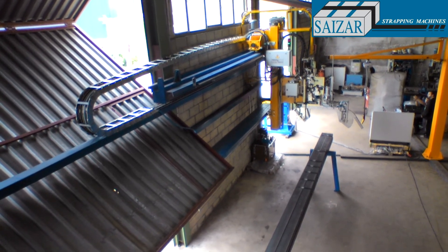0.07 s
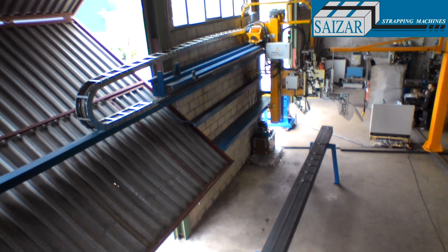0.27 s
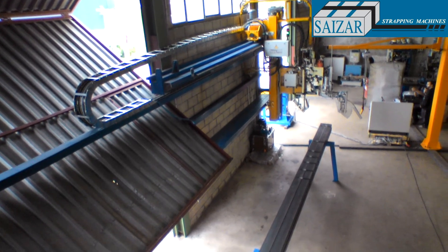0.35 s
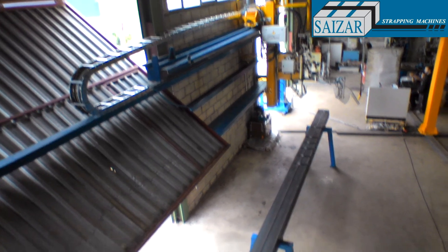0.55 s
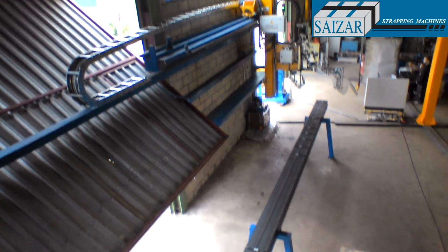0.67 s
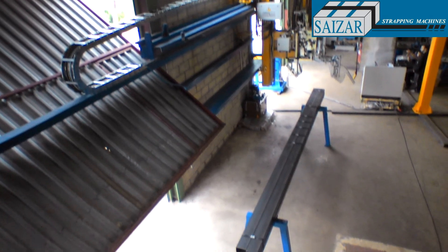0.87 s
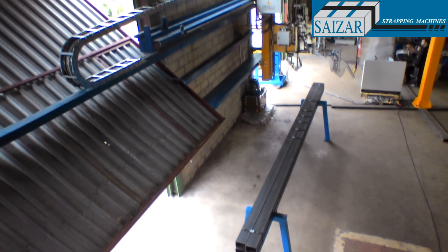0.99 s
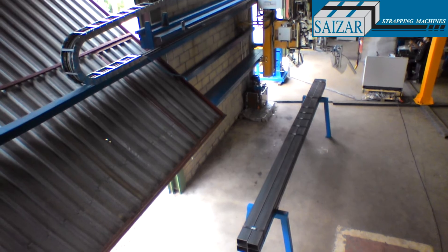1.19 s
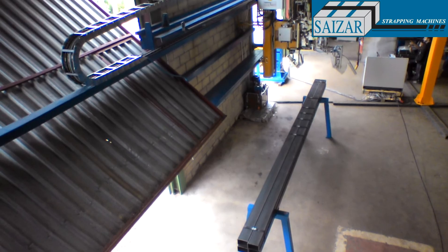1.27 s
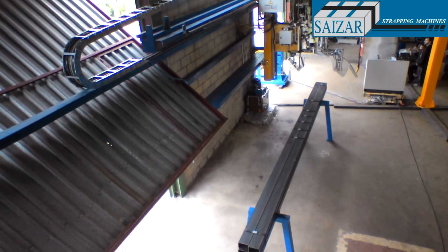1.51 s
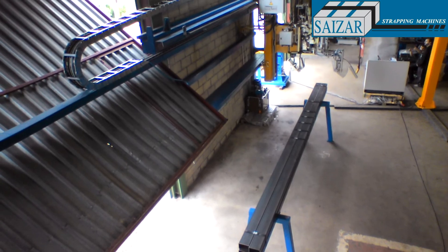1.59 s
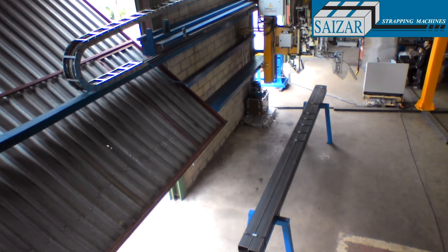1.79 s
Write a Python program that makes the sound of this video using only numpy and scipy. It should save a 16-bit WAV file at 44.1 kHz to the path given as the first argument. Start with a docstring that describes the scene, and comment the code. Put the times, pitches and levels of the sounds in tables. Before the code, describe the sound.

In a large hard-walled industrial hall, a distant microphone picks up steady machine hum and quick low pulsing, then a double clank of steel bars with clattering bounces and short echo, leaving only the machinery.

```python
"""In a large workshop, steel bars knock together twice some metres away, each time with a few bounces.
Contacts ring the modes of the bars over grit, rattle and decaying sines from the frame.
A piston machine thuds steadily in the bass, as kicks through casing resonances;
other machines hum and whine, as shaped noise and fuzzy tones. Sparse decaying taps make the hall
that smears the clanks; the bass is cut, and the sound ends sharply near 7.9 kHz."""
import sys
import numpy as np
from scipy import signal
from scipy.fft import rfft, irfft, next_fast_len
from scipy.io import wavfile
from scipy.ndimage import uniform_filter1d

SR = 44100
rng = np.random.default_rng(int(sys.argv[2]) if len(sys.argv) > 2 else 0)


def to_linear_factor(level_db):
    """Convert decibel levels (scalar or array-like) to linear amplitude factors."""
    exponent = np.asarray(level_db, float) / 20
    return 10 ** exponent


def bounce(signal):
    """Save signal as a 16-bit WAV file at the path given by the first command-line argument."""
    frames = np.transpose(np.atleast_2d(signal))
    limited = np.clip(frames, -1, 1)
    pcm = np.round(limited * 32767).astype(np.int16)
    wavfile.write(sys.argv[1], SR, pcm)


N = 81585


def evened(x):
    """Scales x to rms 1."""
    return x / np.sqrt(np.mean(x ** 2) + 1e-20)


def read(points, hz):
    """Interpolates a table over log frequency."""
    point_hz, value = np.transpose(points)
    return np.interp(np.log(hz + 1), np.log(point_hz + 1), value)


def level_curve(points, **outside):
    """Interpolates a table of levels over time, in dB per sample."""
    point_s, level_db = np.transpose(points)
    return np.interp(np.arange(N) / SR, point_s, level_db, **outside)


def add(mix, start_s, sound):
    """Adds sound into mix in place, cut at the end of mix."""
    part = mix[round(start_s * SR):][:len(sound)]
    part += sound[:len(part)]


def resonate(x, hz, width_hz):
    """One resonance of gain 1: shift to 0 Hz, one-pole lowpass, shift back."""
    turn = np.exp(2j * np.pi * hz * np.arange(len(x)) / SR)
    pole = np.exp(-np.pi * width_hz / SR)
    return 2 * (turn * signal.lfilter([1 - pole], [1, -pole], x / turn)).real


def resonate_twice(x, hz, width_hz):
    """Two equal resonances in series, for steeper skirts."""
    return resonate(resonate(x, hz, width_hz), hz, width_hz)


def coloured(x, points):
    """Filters x by the (Hz, dB) table."""
    size = next_fast_len(len(x))
    gain = to_linear_factor(read(points, np.fft.rfftfreq(size, 1 / SR)))
    return irfft(rfft(x, size) * gain, size)[:len(x)]


# Machine noise spectrum below SPLIT_HZ. Each row: frequency in Hz, relative density in dB per Hz.
HUM_LOW_SPECTRUM = [(24, -75), (40, -49), (70, -53), (117, -10.5), (200, 0.5), (299, 1), (323, -8),
                    (369, -12), (483, -12.5), (669, -8.5), (736, -12), (1100, -12.5), (3900, -26.5),
                    (5070, -47), (8580, -120)]
# Same above SPLIT_HZ, before HIGH_DB. Each row: frequency in Hz, relative density in dB per Hz.
HUM_HIGH_SPECTRUM = [(2380, -31), (4050, -10.5), (4130, -5), (4750, -4.5), (7070, -15.5), (7730, -23),
                     (10000, -53.5), (17000, -120)]
SPLIT_HZ, HIGH_DB = 3960, -28
BASS_HUM_DB = -6  # added below 320 Hz
HUM_RMS_DB, PATCH_SPREAD_DB = -32.5, 0.74


def hum():
    """Broad machine noise: shaped random spectra with slowly drifting patches of level."""
    frames, hz = N // 256 + 5, np.fft.rfftfreq(1024, 1 / SR)
    real, imag, patches = rng.standard_normal((frames, 513, 3)).T
    patches = uniform_filter1d(patches, size=10, axis=0)
    patches = evened(uniform_filter1d(patches, size=10, axis=1))
    high_db = read(HUM_HIGH_SPECTRUM, hz) + HIGH_DB
    shape_db = np.where(hz < SPLIT_HZ, read(HUM_LOW_SPECTRUM, hz), high_db)
    shape_db = shape_db + BASS_HUM_DB * (hz < 320)
    spectra = (real + 1j * imag) * to_linear_factor(shape_db[:, None] + PATCH_SPREAD_DB * patches)
    noise = signal.istft(spectra, nperseg=1024, noverlap=768)[1][:N]
    return to_linear_factor(HUM_RMS_DB) * evened(noise)


# Machine whines. Each row: frequency in Hz, width of each resonance pass in Hz, rms level in dB,
# power share of steady tone from 0 to 1.
WHINE_TONES = [(607, 4.7, -46.5, 0.3), (681, 9.9, -42, 0.5), (894, 21, -51.5, 0.9), (1122, 6.8, -51.5, 0),
               (1231, 27, -49.5, 0.4), (1766, 8.9, -67, 0.3), (1905, 19, -55.5, 0), (2103, 17, -54.5, 0.8)]


def whines():
    """Each whine mixes a steady sine with noise narrowed by resonance."""
    out = np.zeros(N)
    for hz, width_hz, db, share in WHINE_TONES:
        tone = evened(np.sin(2 * np.pi * (hz * np.arange(N) / SR + rng.random())))
        fuzz = evened(resonate_twice(rng.standard_normal(N), hz, width_hz))
        out += to_linear_factor(db) * (np.sqrt(share) * tone + np.sqrt(1 - share) * fuzz)
    return out


# Casing resonances. Each row: frequency in Hz, width of each resonance pass in Hz, gain in dB.
CASING_MODES = [(132.3, 16.7, -2), (177.5, 44, -1), (197.9, 35.8, 2), (246.7, 50.6, -11), (301.3, 27, -11)]


def casing(kicks):
    """The casing rings in parallel resonances."""
    return sum(to_linear_factor(db) * resonate_twice(kicks, hz, width_hz) for hz, width_hz, db in CASING_MODES)


# Piston level, before PISTON_GAIN_DB. Each row: time in seconds, level in dB.
PISTON_LEVEL = [(0, -37.5), (.6, -37.5), (1.0, -38.5), (1.35, -37.5), (1.49, -35), (1.58, -32),
                (1.67, -35.5), (1.85, -35.5)]
PISTON_GAIN_DB = -1.25
TURN_S, FIRST_S = .0917, .02
RETURN_DB, STROKE_SPREAD_DB = -6.5, 1.0


def piston():
    """Two kicks per turn, a main stroke and a weaker return half a turn later, ring the casing."""
    kicks, times_s = np.zeros(N), np.arange(FIRST_S, N / SR, TURN_S / 2)
    is_return = np.arange(len(times_s)) % 2
    stroke_db = RETURN_DB * is_return + STROKE_SPREAD_DB * rng.standard_normal(len(times_s))
    kicks[(times_s * SR).astype(int)] = to_linear_factor(stroke_db)
    loaded = kicks * to_linear_factor(PISTON_GAIN_DB + level_curve(PISTON_LEVEL))
    return casing(loaded) / np.std(casing(kicks))


# Scrape level, before SCRAPE_GAIN_DB. Each row: time in seconds, rms from 2.5 to 7 kHz in dB.
SCRAPE_LEVEL = [(0.19, -56), (0.2, -47.5), (0.211, -29.5), (0.222, -24), (0.244, -34), (0.38, -46.5),
                (0.388, -30.5), (0.406, -40), (0.586, -43), (0.59, -59.5), (0.644, -58), (0.75, -45.5)]
# Scrape spectrum. Each row: frequency in Hz, relative density in dB per Hz.
SCRAPE_SPECTRUM = [(400, -27), (900, -2), (1600, -2), (2400, -9), (3800, -9), (4200, -17.5), (5500, -25.5),
                   (7500, -42), (9000, -76.5)]
SCRAPE_GAIN_DB, GRIT_PER_S, GRIT_SPREAD_DB = -4, 2500, 3


def scrape():
    """Steel grinds on steel around the blows: dense grit of uneven size and random sign, filtered."""
    size_db = GRIT_SPREAD_DB * np.minimum(rng.exponential(1, N), 4)
    grit = (rng.random(N) < GRIT_PER_S / SR) * to_linear_factor(size_db) * rng.choice([-1., 1.], N)
    grit = coloured(grit, SCRAPE_SPECTRUM)
    treble_band = signal.butter(4, [2500, 7000], "band", fs=SR, output="sos")
    treble = signal.sosfilt(treble_band, grit)
    level_db = SCRAPE_GAIN_DB + level_curve(SCRAPE_LEVEL, left=-99, right=-99)
    return to_linear_factor(level_db) * grit / np.std(treble)


RING_T60_1KHZ_S, RING_POWER = .07, -.1  # t60 follows a power law over pitch


def ring(hz, rise_s):
    """One mode: it swells while the contact lasts, then dies away exponentially."""
    t = np.arange(0, .25, 1 / SR)
    swell = (1 - np.exp(-t / max(rise_s, .0013))) ** 2
    t60_s = RING_T60_1KHZ_S * (hz / 1000) ** RING_POWER
    return swell * to_linear_factor(-60 * t / t60_s) * np.sin(2 * np.pi * hz * t)


# Modes of the bars. Each row: frequency in Hz, relative level in dB.
BAR_MODES = [(555, 5), (590, 4.5), (621, -3.5), (648, -2.5), (685, 7), (730, 7), (785, 0.5), (835, 6.5),
             (885, 1), (938, 5), (1078, 3), (1120, 0), (1150, -8), (1220, 1), (1318, -2), (1398, 5),
             (1464, 2), (1560, -9), (1628, 3), (1850, -5), (2085, -2), (2230, -3), (2315, -9), (2680, -7.5),
             (2850, -13), (3030, -7), (3120, -7.5), (3260, -13.5), (3420, -14.5), (3640, -32), (3890, -15),
             (4700, -21.5), (5300, -22)]
# Rattle level. Each row: time in seconds, level in dB.
RATTLE_LEVEL = [(.2, -45.5), (.228, -20), (.3, -32), (.376, -39), (.4, -32.5), (.498, -30.5), (.7, -51),
                (.85, -58)]
KNOCKS_PER_S_PER_MODE, KNOCK_SPREAD_DB = 40, 4
TILT_DB_PER_OCTAVE = 2  # small knocks are brighter


def rattle():
    """Many small uneven knocks, each ringing one mode, while the bars settle."""
    out = 0
    for hz, db in BAR_MODES:
        size_db = KNOCK_SPREAD_DB * np.minimum(rng.exponential(1, N), 3)
        knocks = (rng.random(N) < KNOCKS_PER_S_PER_MODE / SR) * to_linear_factor(size_db)
        mode_db = db + TILT_DB_PER_OCTAVE * np.log2(hz / 1000)
        out = out + to_linear_factor(mode_db) * signal.oaconvolve(knocks, ring(hz, rise_s=.0013))[:N]
    return to_linear_factor(level_curve(RATTLE_LEVEL, left=-99, right=-99)) * evened(out)


COLOUR_OCTAVES = .05  # spread of the strongly rung modes
DETUNE = 0.0068  # each blow shifts every mode a little at random: relative standard deviation


def blow(peak_db, centre_hz, far_db, contact_s):
    """A contact rings all modes, most of all those near the centre; a longer one swells slower."""
    out = 0
    for hz, db in BAR_MODES:
        near = np.exp(-.5 * (np.log2(hz / centre_hz) / COLOUR_OCTAVES) ** 2)
        far = to_linear_factor(db + far_db) * rng.standard_normal()
        detuned_hz = hz * (1 + DETUNE * rng.standard_normal())
        out = out + (near + far) * ring(detuned_hz, contact_s / 3)
    peak = np.sqrt(2 * uniform_filter1d(out ** 2, size=500).max())  # sine peak of the loudest 11 ms
    return to_linear_factor(peak_db) * out / peak


def thump(db, hz):
    """The frame under the bars sounds one low sine: quick rise, exponential decay."""
    t = np.arange(0, .3, 1 / SR)
    rise = 1 - np.exp(-t / 0.0016)
    return to_linear_factor(db - 60 * t / 0.087) * rise * np.sin(2 * np.pi * hz * t)  # t60 87 ms


# Contacts of the bars. Each row: start in seconds, peak in dB, centre of the colour in Hz,
# level of the far modes in dB, length of the contact in seconds.
BAR_BLOWS = [(.204, -24.5, 693, -19.5, 0.0096), (.207, -24.5, 3350, -19, 0.018),
             (.213, -25.5, 1628, -22, 0.0061), (.217, -26.5, 3890, -12, .006),
             (.221, -28, 1300, -18.5, .006), (.227, -8, 1098, -30, 0.0078),
             (.238, -9.5, 940, -29.5, 0.0079), (0.246, -24.5, 1504, -19, .004),
             (.251, -22, 930, -27.5, .003), (.259, -34.5, 2800, -27, .005), (0.26, -20.5, 1095, -23, .003),
             (.278, -22.5, 660, -14, .004), (.279, -16, 940, -7, .003), (.286, -39, 2870, -21, .006),
             (.315, -39, 2960, -22.5, 0.0043), (.328, -43.5, 3220, -26.5, .004),
             (.297, -14, 1100, -25.5, 0.0053), (0.31, -21.5, 940, -5.5, .002), (.328, -21, 1063, -10, .003),
             (.344, -35.5, 3410, -24, .0044), (.345, -21.5, 658, -20.5, 0.0052),
             (0.351, -23, 900, -9.5, .003), (0.361, -24.5, 1210, -27, .003), (.371, -25.5, 925, -17, .004),
             (0.3851, -26, 2680, -21, .003), (.387, -12.5, 808, -23, .003),
             (.396, -14, 1379, -24.5, 0.0055), (0.398, -19.5, 1177, -17, .003),
             (.404, -22.5, 932, -22.5, 0.0052), (.411, -19, 640, -20.5, 0.01),
             (.414, -24, 2085, -16.5, .005), (.413, -20, 1397, -7.5, 0.011),
             (.432, -21.5, 1210, -11.5, 0.0024), (.433, -22.5, 610, -19, .008),
             (.438, -21.5, 2376, -16.5, 0.0035), (.44, -45, 4700, -33, .007),
             (0.449, -23.5, 1435, -9, .004), (.452, -17, 666, -10.5, .009),
             (.459, -23.5, 2210, -14, 0.0036), (.466, -21.5, 596, -20, 0.0026),
             (.472, -27, 1400, -18.5, 0.0044), (.495, -28.5, 1193, -19, 0.004),
             (0.496, -32.5, 3080, -11, 0.0063), (.5, -30, 2080, -23.5, .004),
             (.505, -45.5, 4700, -32.5, 0.016), (.52, -34, 675, -8, .004), (0.52, -34, 3010, -21, .004),
             (.534, -24, 1318, -17, 0.0046), (.537, -32, 740, -14, 0.0032),
             (.565, -31.5, 1410, -14, 0.0045), (.588, -28.5, 1110, -15.5, 0.0035),
             (.6, -27, 620, -18.5, 0.0069), (.632, -28.5, 835, -9.5, .006), (.656, -35.5, 1335, -23, .0048)]
# Thumps of the frame. Each row: start in seconds, level before rise and decay in dB, frequency in Hz.
FRAME_THUMPS = [(.231, -17, 167.3), (.293, -25, 177), (0.313, -16.5, 199.6), (.383, -14.5, 179.7),
                (.42, -25, 308), (0.432, -18.5, 176)]


def bars():
    """Sums scrape, rattle, blows and frame thumps."""
    out = scrape() + rattle()
    for start_s, *contact in BAR_BLOWS:
        add(out, start_s, blow(*contact))
    for start_s, db, hz in FRAME_THUMPS:
        add(out, start_s, thump(db, hz))
    return out


# Hall decay. Each row: frequency in Hz, t60 in seconds.
HALL_T60 = [(150, 2), (600, 1.4), (1200, 1.02), (2500, 3), (5000, 0.91)]


def hall(x):
    """Sparse taps of random sign, each band dying at its own speed; tail of unit energy."""
    taps = np.zeros(SR)
    slots = np.arange(300, SR - 20, 20)
    taps[slots + rng.integers(0, 20, len(slots))] = rng.choice([-1., 1.], len(slots))
    hz, t, bands = signal.stft(taps, SR, nperseg=256)
    decay = to_linear_factor(-60 * t / read(HALL_T60, hz)[:, None])
    tail = signal.istft(bands * decay, SR, nperseg=256)[1]
    return signal.fftconvolve(x, tail / np.linalg.norm(tail))[:N]


HALL_DB = -9


def scene():
    """Clanks in the hall over the machines."""
    machines = hum() + whines() + piston()
    steel = bars()
    return (steel + to_linear_factor(HALL_DB) * hall(steel) + machines)[None]


def low_pass(x):
    """Removes everything above the highest recorded frequency."""
    return signal.sosfilt(signal.butter(12, 7880, fs=SR, output="sos"), x)


LOW_CUT_HZ, TOP_CUT_HZ = 130.4, 7900


def record(dry):
    """The bass is cut, and the sound ends sharply near 7.9 kHz."""
    bass_cut = signal.butter(4, LOW_CUT_HZ, "high", fs=SR, output="sos")
    treble_cut = signal.firwin(255, TOP_CUT_HZ, window=("kaiser", 9), fs=SR)
    thinned = signal.sosfilt(bass_cut, dry)
    mix = signal.oaconvolve(thinned, treble_cut[None], "same")
    return low_pass(mix)


dry = scene()
out = record(dry)
bounce(out)
```